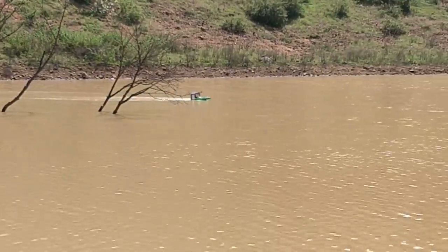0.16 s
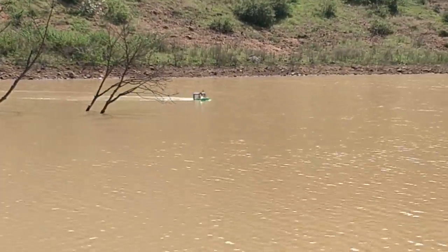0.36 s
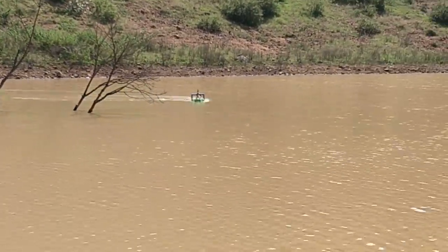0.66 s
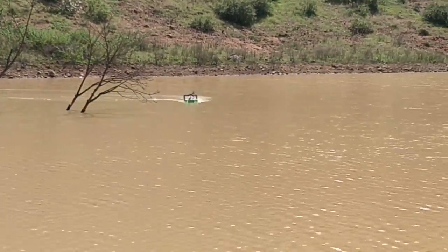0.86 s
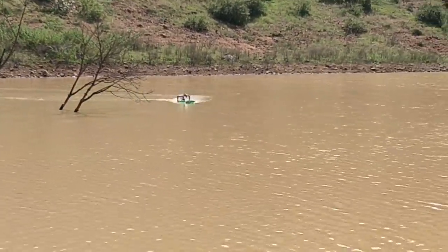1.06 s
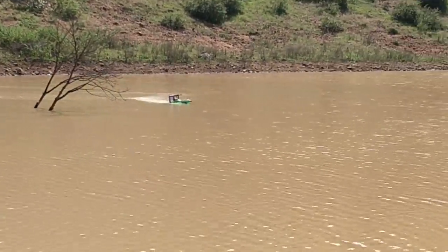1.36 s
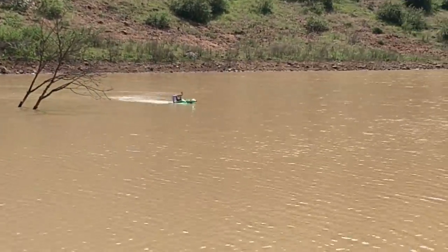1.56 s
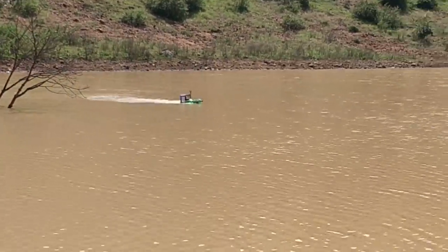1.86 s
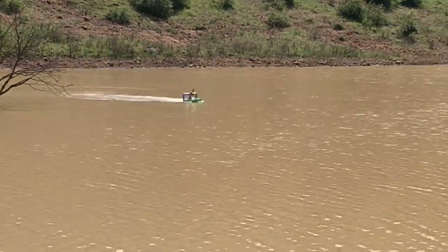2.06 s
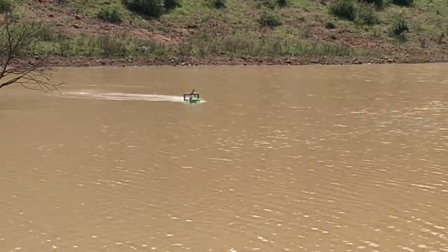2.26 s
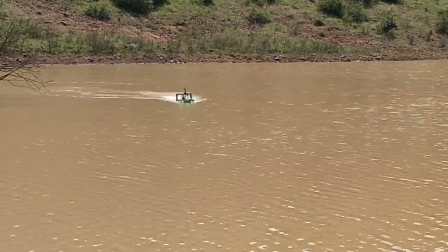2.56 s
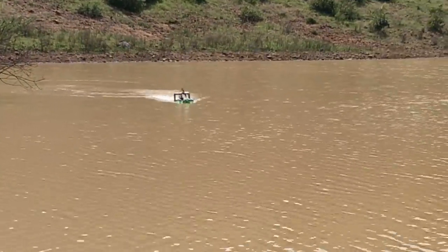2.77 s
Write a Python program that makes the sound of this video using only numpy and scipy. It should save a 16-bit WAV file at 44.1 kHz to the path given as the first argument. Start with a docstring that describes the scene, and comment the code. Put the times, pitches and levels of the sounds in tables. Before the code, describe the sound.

High buzzing whine of a speeding electric toy boat, rising then holding, with spray and wind buffets

```python
"""An electric model boat whines across a lake, some tens of metres from two open microphone ports.
Brief wind thuds come early; from about half a second the shaft speeds up, then holds for the last second.
The two-bladed propeller slaps the surface twice a turn: whine from shaft harmonics, rasp from uneven clicks,
spray from noise bursts. The wake's hiss swells and sinks with the spray; the lake washes as faint steady noise.
Wind is noise in uneven buffets, with more thuds around one second and the hardest gusts near the end."""
import sys
import numpy as np
from scipy import signal
from scipy.fft import rfft, irfft, next_fast_len
from scipy.io import wavfile
from scipy.ndimage import map_coordinates

SR = 44100
rng = np.random.default_rng(int(sys.argv[2]) if len(sys.argv) > 2 else 0)


def transcribe(signal):
    """Save signal, clipped to [-1, 1], as a 16-bit WAV file at the path in sys.argv[1]."""
    frames = np.atleast_2d(signal).T
    limited = np.clip(frames, -1, 1)
    pcm = np.round(limited * 32767).astype(np.int16)
    wavfile.write(sys.argv[1], SR, pcm)


N = 127890
SECONDS = np.arange(N) / SR
TOP_HZ = 15750  # upper edge of the recorder

# Level that ticks, spray and wake share, before their own trims. Each row: time in seconds, level in dB.
SPRAY_LEVEL = [(0, -54.5), (0.2, -51), (0.52, -47.5), (0.88, -47), (1.06, -42.5), (1.15, -44),
               (1.22, -43.5), (1.42, -45), (1.56, -49.5), (1.82, -46.5), (2.12, -41.5), (2.3, -43),
               (2.66, -43), (2.82, -39.5), (2.9, -43)]
# How cleanly the blades bite: more tick, less spray and wake. Each row: time in seconds, bite in dB.
BITE = [(0,-1),(.9,0),(1.3,2),(1.9,1.5),(2.3,-1.5),(2.9,-1.5)]


def undb(db):
    """Decibels to gain."""
    return 10 ** (np.asarray(db) / 20)


def unit(x):
    """Scale to rms 1."""
    return x / np.sqrt(np.mean(x ** 2))


def curve(rows):
    """Join (seconds, value) rows by straight lines."""
    return np.interp(SECONDS, *np.array(rows, float).T)


def walk(rate):
    """Smooth random curve of rms 1 through a new chance value rate times a second."""
    points = rng.standard_normal(4096)
    return unit(map_coordinates(points, [SECONDS * rate], order=3, mode="wrap"))


def colour(x, points):
    """Causal minimum-phase filter with the given (Hz, dB) response; rms 1."""
    hz, db = np.array(points, float).T
    size = next_fast_len(N + 8192, real=True)
    grid = np.maximum(np.fft.rfftfreq(size, 1 / SR), 1)
    log_gain = np.log(undb(np.interp(np.log(grid), np.log(hz), db)))
    # folding the cepstrum onto positive times makes the response causal
    cepstrum = irfft(log_gain, size)
    cepstrum[1:size // 2] *= 2
    cepstrum[size // 2 + 1:] = 0
    response = np.exp(rfft(cepstrum))
    return unit(irfft(rfft(x, size) * response, size)[:N])


def hiss(envelope, points, width):
    """Coloured noise under an envelope, partly unrelated at the two ports."""
    mid = colour(envelope * rng.standard_normal(N), points)
    side = colour(envelope * rng.standard_normal(N), points)
    return mid + width * side * np.array([[1], [-1]])


def boat():
    """One shaft drives whine, slaps and spray; the ports differ in level and phase with frequency."""
    # Shaft speed. Each row: time in seconds, speed in turns per second.
    shaft = [(0, 280.9), (0.3, 281.5), (0.47, 282.8), (0.57, 291.8), (0.63, 294.6), (0.85, 295.5),
             (0.97, 298.7), (1.03, 303.3), (1.18, 305.3), (1.26, 309.3), (1.41, 313.7), (1.52, 312.8),
             (1.66, 313.7), (1.75, 318.7), (2.08, 323.4), (2.3, 322.3), (2.9, 322.0)]
    # Difference between the ports. Each row: frequency in Hz, left minus right in dB, left lead in radians.
    ports = [(0,-3.5,0),(1310,-1.5,.25),(2560,-1.5,-.2),(4570,2,1.25),(8600,1.5,.75),(12300,-3,1.65),(15400,0,1.5)]
    speed_jitter, jitter_per_s = .0006, 25  # rms share of the speed, rate

    speed = curve(shaft) * (1 + speed_jitter * walk(jitter_per_s))
    turns = np.cumsum(speed) / SR
    half_turns = np.arange(1, int(2 * turns[-1])) / 2
    times = np.interp(half_turns, turns, SECONDS)
    sound = whine(turns) + fading(slaps(times) + spray(turns, speed))

    hz, db, lead = np.array(ports, float).T
    grid = np.fft.rfftfreq(N, 1 / SR)
    # each port takes half of the difference
    left = undb(np.interp(grid, hz, db) / 2) * np.exp(.5j * np.interp(grid, hz, lead))
    return irfft(rfft(sound) * np.array([left, 1 / left]), N)


def whine(turns):
    """Harmonics of blade and shaft rate; the higher ones waver more, to a limit, as the hull rides ripples."""
    # Levels of 2, 4, 6, 8 and 10 times shaft speed, before wavering.
    # Each row: time in seconds, rms level in dB.
    blade_level = [(0,-57.5),(.25,-57.5),(.42,-60.5),(.66,-53.5),(.95,-55),(1.42,-52.5),(1.75,-53),(2.05,-56.5),(2.9,-55)]
    second_level = [(0,-58),(.35,-59.5),(.8,-57.5),(1.0,-59),(1.14,-54),(1.28,-51),(1.62,-59),(1.9,-59.5),(2.14,-51.5),(2.45,-50.5),(2.9,-54)]
    third_level = [(0,-64.5),(.6,-64),(1.0,-58.5),(1.25,-61.5),(1.6,-71.5),(2.0,-64.5),(2.3,-58),(2.9,-55.5)]
    fourth_level = [(0,-67),(.8,-61.5),(1.08,-50.5),(1.17,-60),(1.3,-52),(1.65,-65),(2.08,-53.5),(2.35,-58),(2.53,-53),(2.675,-57),(2.705,-44),(2.82,-44),(2.84,-56)]
    fifth_level = [(0,-79),(.2,-62),(.95,-61.5),(1.08,-51.5),(1.18,-69),(1.31,-54.5),(1.5,-57.5),(1.62,-68.5),(2,-57.5),(2.17,-86),(2.67,-78),(2.735,-43),(2.77,-75),(2.815,-47),(2.85,-65)]
    # Partials of the unbalanced shaft. Each row: multiple of shaft speed, dB above the shared shaft level.
    shaft_lines = [(1,-5),(3,-11.5),(5,1.5),(7,-15.5),(13,1.5)]
    # Shared level of those partials. Each row: time in seconds, level in dB.
    shaft_level = [(0,-72.5),(.9,-67),(1.25,-63),(1.7,-60.5),(2.1,-59.5),(2.9,-62)]
    pole_order, pole_db = 42, -72  # thin whistle of the motor's poles
    waver_db, waver_max_db, waver_per_s = .35, 3, 56  # dB per multiple, limit in dB, rate

    blade_levels = [blade_level, second_level, third_level, fourth_level, fifth_level]
    partials = [(2 * i, curve(rows)) for i, rows in enumerate(blade_levels, 1)]
    partials += [(pole_order, pole_db)]
    partials += [(k, db + curve(shaft_level)) for k, db in shaft_lines]
    total = np.zeros(N)
    for k, db in partials:
        waver = min(waver_db * k, waver_max_db) * walk(waver_per_s)
        total += undb(db + waver) * np.cos(2 * np.pi * k * turns)
    return -np.sqrt(2) * total


def slaps(times):
    """Blades slap early or late with the ripples; the air they drag under collapses with a bright tick."""
    # Level of the slaps before trim and flutter. Each row: time in seconds, level in dB.
    slap_level = [(0,-62.5),(.2,-56.5),(.68,-48),(.85,-49.5),(1.08,-46.5),(1.16,-49.5),(1.32,-47),(1.58,-54.5),(1.76,-48),(2.3,-52),(2.67,-49.5),(2.735,-37.5),(2.78,-58),(2.82,-40.5),(2.9,-52)]
    # Colours of slap and tick. Each row: frequency in Hz, response in dB.
    slap_colour = [(300,-38),(2000,-21.5),(2900,-6),(3400,-5),(3850,2),(4150,6),(4500,2),(5000,2),(5600,3),(6300,-5),(7000,0),(8000,-11),(16000,-38.5)]
    tick_colour = [(300,-49),(4000,-30),(6200,-6),(7000,-3),(8200,0),(9500,-2.5),(12000,-9),(16000,-24)]
    slap_db, slap_flutter_db, slap_flutter_per_s = -.5, 1.5, 30.23
    tick_db, tick_flutter_db, tick_flutter_per_s = -3.2, .7, 29.56
    ripple_shift_s, ripple_per_s = .000012, 80  # rms shift of a stroke, rate

    # each of the two blades has its own ripple curve
    stroke = np.arange(len(times))
    ripples = np.array([walk(ripple_per_s), walk(ripple_per_s)])
    times = times + ripple_shift_s * ripples[stroke % 2, (times * SR).astype(int)]

    slap = colour(clicks(times, scatter_db=2.0, jitter_s=.000004), slap_colour)
    tick = colour(clicks(times, scatter_db=1.5, jitter_s=.000004), tick_colour)
    slap_gain_db = curve(slap_level) + slap_db + slap_flutter_db * walk(slap_flutter_per_s)
    tick_gain_db = curve(SPRAY_LEVEL) + curve(BITE) + tick_db
    tick_gain_db += tick_flutter_db * walk(tick_flutter_per_s)
    return slap * undb(slap_gain_db) + tick * undb(tick_gain_db)


def clicks(times, scatter_db, jitter_s):
    """A sharp click of its own size at each blade stroke; one blade bites less."""
    weak_blade_db = -6.5
    chance = rng.standard_normal((4096, 2))[:len(times)]
    weak = np.arange(len(times)) % 2
    size = undb(scatter_db * chance[:, 0] + weak_blade_db * weak)
    at = (times + jitter_s * chance[:, 1]) * SR
    # a windowed sinc places each click between samples
    taps = at.astype(int)[:, None] + np.arange(-7, 9)
    offset = taps - at[:, None]
    shape = np.sinc(offset) * np.sinc(offset / 8)
    return np.bincount(taps.ravel() % N, (-size[:, None] * shape).ravel(), N)


def spray(turns, speed):
    """Decaying noise bursts, one a blade stroke, over the wake's hiss, which gains on them as both swell and sink."""
    # Colour of spray and wake. Each row: frequency in Hz, response in dB.
    spray_colour = [(300,-20),(1400,-9),(2100,-17),(2800,-6.5),(3400,-14),(4200,-4.5),(5900,-6),(6800,-1.5),(9600,0),(12000,-3),(15500,-10)]
    spray_db, decay_s, scatter_db, spray_width = -5.8, .0004, 4, .25
    wake_db, wake_rise_db_per_s, wake_width = -3.6, .5, .55  # start and rise against the shared level
    flutter_db, flutter_per_s = .8, 39.74

    blade = (2 * turns).astype(int)
    age = (2 * turns - blade) / (2 * speed)  # seconds since the stroke
    size = undb(scatter_db * rng.standard_normal(4096)[blade])
    burst = np.exp(-age / decay_s) * size
    wake = undb(wake_db + wake_rise_db_per_s * SECONDS) * hiss(1, spray_colour, wake_width)
    water = undb(spray_db) * hiss(burst, spray_colour, spray_width) + wake
    return water * undb(curve(SPRAY_LEVEL) - curve(BITE) / 2 + flutter_db * walk(flutter_per_s))


def fading(x):
    """Moving air and rippled water on the way make each band swell and fade by itself."""
    fade_db, fade_per_s, band_hz = 2.4, 50, 620  # rms depth, rate, spacing of bands
    hz, spectrum = np.fft.rfftfreq(N, 1 / SR), rfft(x)
    total = 0
    for centre in np.arange(0, TOP_HZ + band_hz, band_hz):
        triangle = np.maximum(1 - abs(hz - centre) / band_hz, 0)
        total = total + irfft(spectrum * triangle, N) * undb(fade_db * walk(fade_per_s))
    return total


def wind(strength):
    """Eddies tumble over one port in quick uneven buffets; a strong gust adds a brighter flutter."""
    # Colours of low rumble and gust flutter. Each row: frequency in Hz, response in dB.
    wind_colour = [(20,-9.5),(60,-3),(130,-0.5),(220,1),(350,-1),(550,-14.5),(800,-23.5),(1200,-26),(2000,-47),(5000,-26),(16000,-76)]
    gust_colour = [(20,-31),(150,-12.5),(350,0),(550,-2),(800,-10.5),(1200,-23),(2000,-35.5),(5000,-50),(16000,-55)]
    buffet_db, buffet_per_s = 3.1, 64
    eddy_db, eddy_per_s = 1.7, 400
    # flutter over rumble in dB at the reference strength in dB, and its growth in dB per dB
    gust_db, gust_from_db, gust_growth = 2.5, -34.5, 1

    db = curve(strength)
    eddies = undb(buffet_db * walk(buffet_per_s) + eddy_db * walk(eddy_per_s))
    rumble = colour(eddies * rng.standard_normal(N), wind_colour)
    flutter = colour(eddies * rng.standard_normal(N), gust_colour)
    return undb(db) * (rumble + flutter * undb(gust_db + gust_growth * (db - gust_from_db)))


def buffets():
    """The hardest eddies give brief thuds of band-passed noise, each with its own brightness."""
    # Each row: centre in seconds, Gaussian spread in seconds, left level in dB, right level in dB,
    # upper edge in Hz.
    thuds = [(.011,0.003,-38.5,-32,510),(0.038,0.00092,-57,-40,600),(0.08,0.0055,-55,-39,585),(0.236,0.003,-60,-37,765),(0.858,0.0019,-38,-60,600),(1.027,0.0039,-57,-29.5,597),(1.08,0.0043,-60,-32,694),(2.331,0.0018,-27,-23,990),(2.504,0.0036,-19.5,-36,700),(2.709,0.0076,-39,-27,1530),(2.895,0.002,-47,-22,796)]
    low_hz = 151
    out = 0
    for at, length, left_db, right_db, top_hz in thuds:
        band = signal.butter(2, [low_hz, top_hz], "band", fs=SR, output="sos")
        twice = np.vstack([band, band])
        air = unit(signal.sosfilt(twice, rng.standard_normal((2, N))))
        swell = np.exp(-((SECONDS - at) / length) ** 2 / 2)
        out = out + air * undb([[left_db], [right_db]]) * swell
    return out


def lake():
    """Faint wash of the lake: steady wide coloured noise."""
    # Each row: frequency in Hz, response in dB.
    lake_colour = [(100,6),(300,-16),(800,-16.5),(4000,-6),(16000,-36)]
    mid_db = -59  # level of the part common to both ports
    return undb(mid_db) * hiss(1, lake_colour, width=1.0)


def scene():
    """Boat, wind at each port, thuds and the wash of the lake."""
    # Strength of the wind at each port. Each row: time in seconds, strength in dB.
    wind_left = [(0,-50),(.15,-55),(.38,-64.5),(.8,-54.5),(1.3,-63),(1.54,-53.5),(1.7,-60.5),(1.88,-46.5),(1.98,-66),(2.02,-42),(2.2,-38),(2.38,-30),(2.52,-33),(2.7,-33),(2.85,-36.5),(2.9,-41)]
    wind_right = [(0,-41.5),(.16,-46.5),(.24,-50),(.36,-54),(.68,-48.5),(.99,-52.5),(1.03,-39),(1.09,-40),(1.13,-51),(1.3,-62),(1.38,-44.5),(1.46,-64),(2.04,-56.5),(2.19,-36),(2.5,-38.5),(2.7,-32.5),(2.84,-43)]
    gusts = np.array([wind(wind_left), wind(wind_right)])
    return boat() + gusts + buffets() + lake()


def record(dry):
    """The recorder cuts the top with a steep low-pass."""
    return signal.sosfilt(signal.ellip(10, .2, 80, TOP_HZ, fs=SR, output="sos"), dry)


dry = scene()
out = record(dry)
transcribe(out)
```